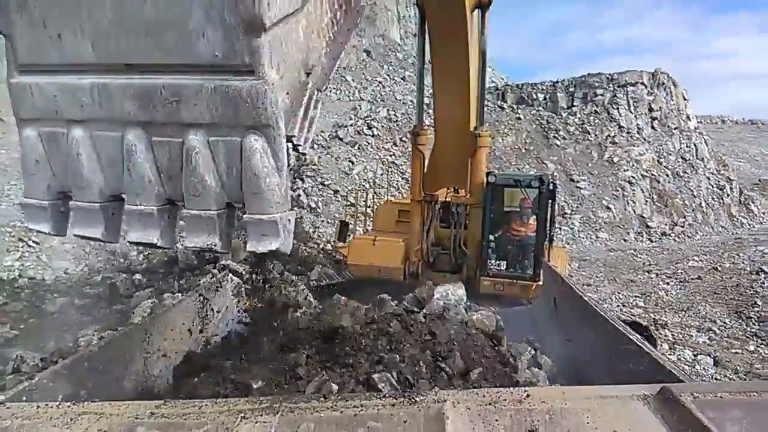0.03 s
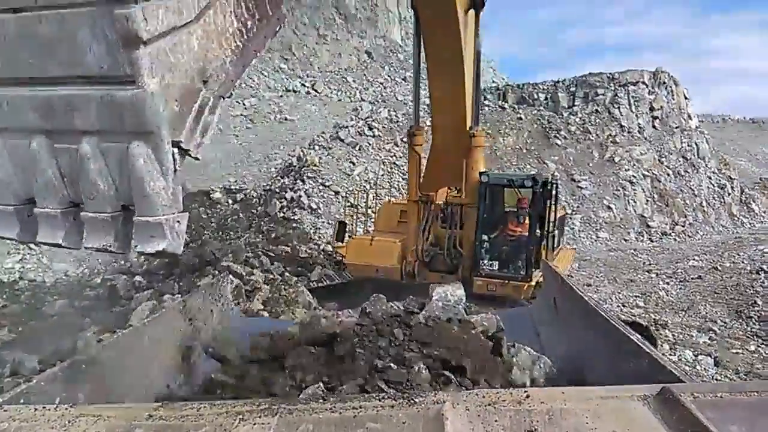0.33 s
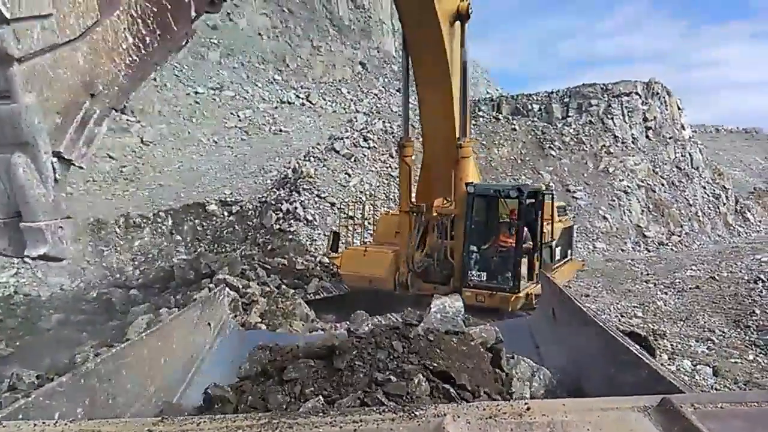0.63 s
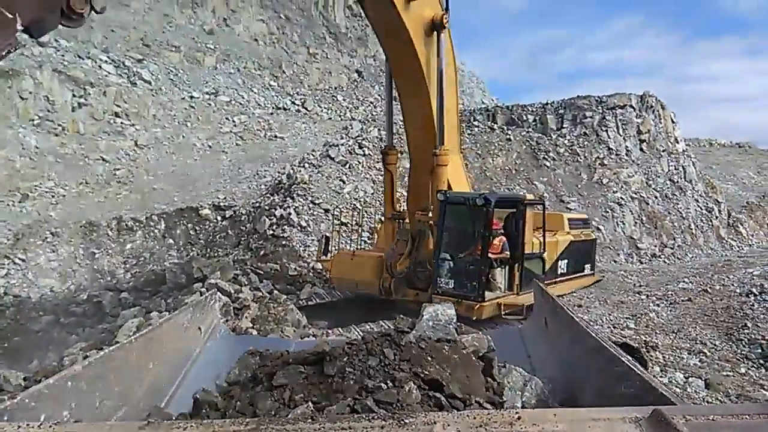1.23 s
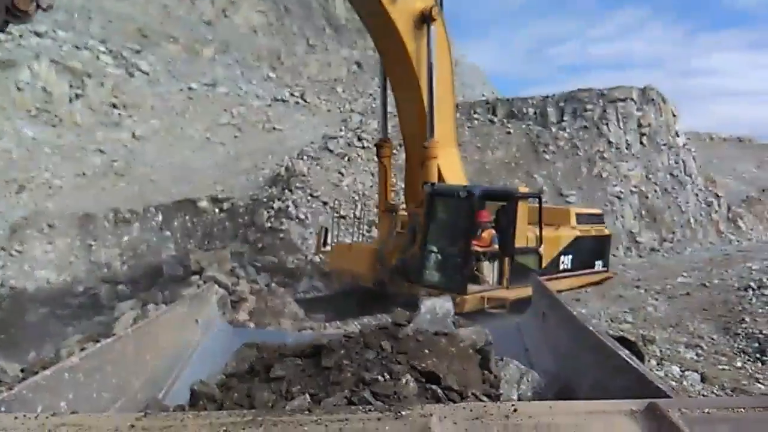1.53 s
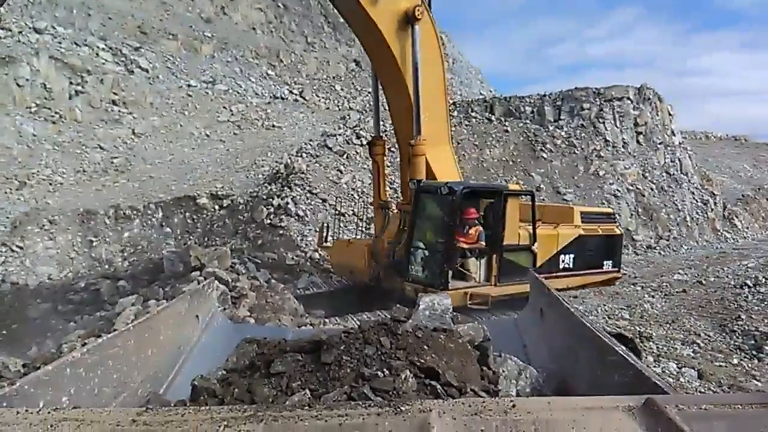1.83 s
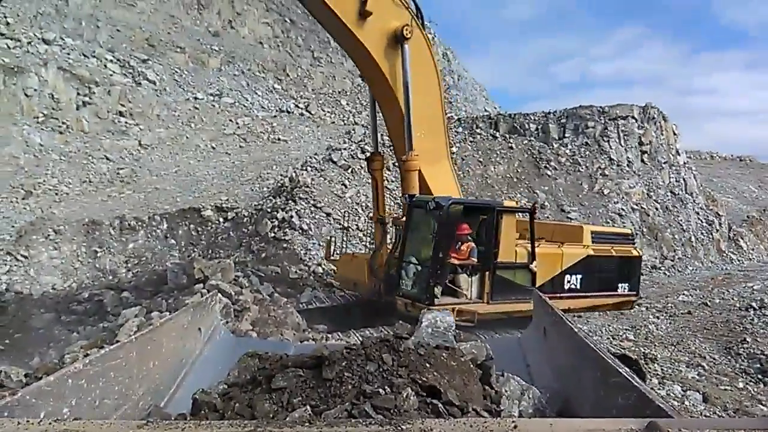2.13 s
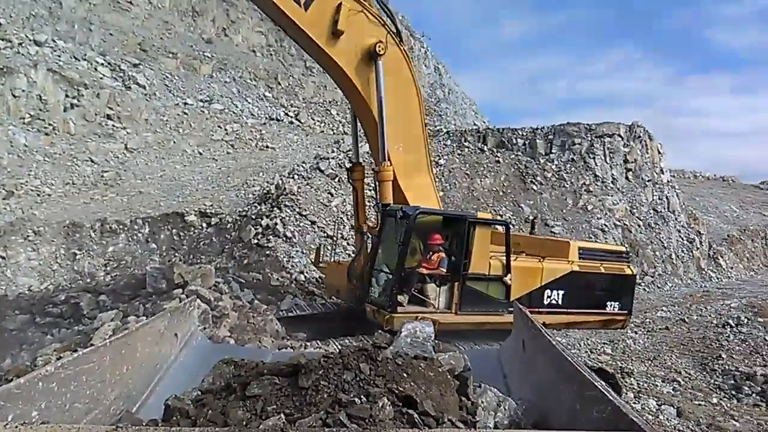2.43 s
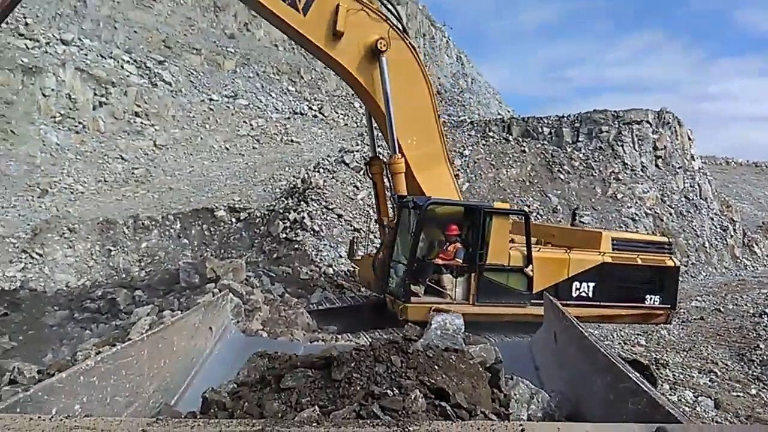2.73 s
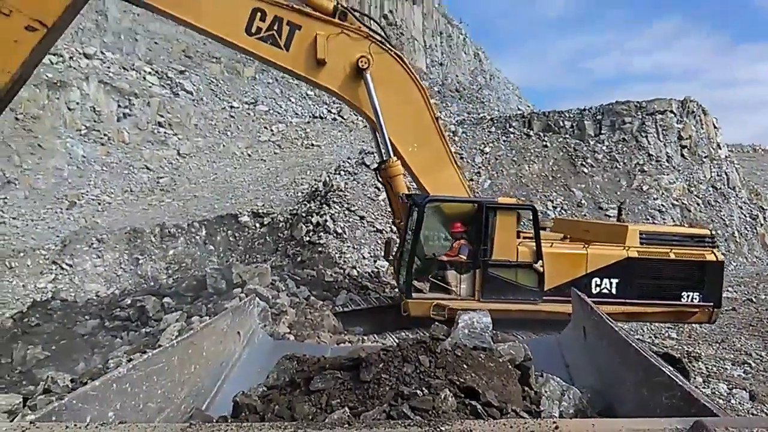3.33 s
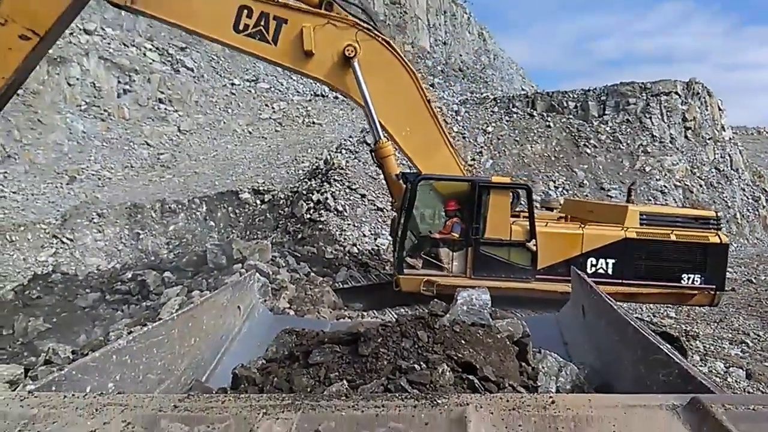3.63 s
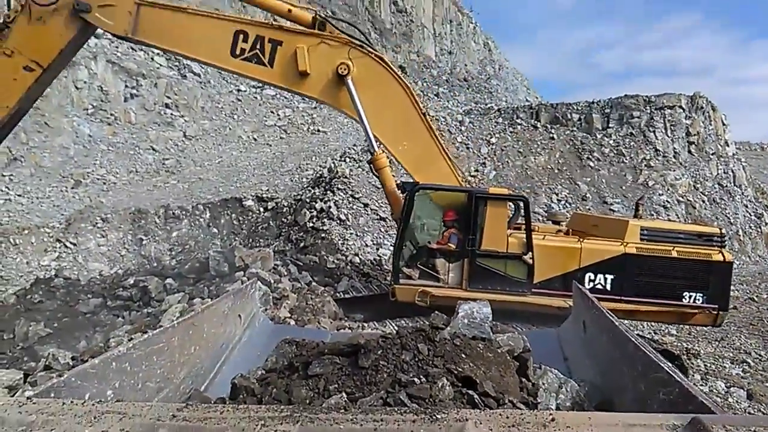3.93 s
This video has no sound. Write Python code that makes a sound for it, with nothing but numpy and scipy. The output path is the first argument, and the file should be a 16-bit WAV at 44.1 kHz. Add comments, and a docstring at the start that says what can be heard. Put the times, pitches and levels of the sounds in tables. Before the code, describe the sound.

An excavator dumps rocks into a truck bed, then swings away, droning and whining.

```python
"""A steel truck bed clatters and booms as the last earth and rocks slide in from an excavator bucket.
Each impact excites the damped modes of the bed's walls or floor. The truck idles throughout; the
excavator's diesel sags under load and beats against it. Its pumps whine at harmonics of their stroke
rate, and oil hisses, sings and whistles through the valves as the boom groans, knocks and swings away."""
import sys
import numpy as np
from scipy import signal
from scipy.fft import rfft, irfft
from scipy.io import wavfile
from scipy.ndimage import uniform_filter1d

SR = 44100
rng = np.random.default_rng(int(sys.argv[2]) if len(sys.argv) > 2 else 0)


def file_out(sig):
    """Save sig as 16-bit WAV at sys.argv[1]."""
    # one column per channel
    cols = np.atleast_2d(sig).T
    # limit, then scale
    lim = np.clip(cols, -1, 1)
    pcm = np.round(lim * 32767).astype(np.int16)
    wavfile.write(sys.argv[1], SR, pcm)


N = 176400

# envelopes of pouring stones, sliding grit and landing earth: (time [s], level [dB])
POUR_LEVEL = [(0, -9), (.06, -14.5), (.14, -18), (.2, -11.5), (.29, -13), (.38, -23.5), (.47, -25),
              (.56, -30), (.66, -34.5), (.76, -40), (.9, -49), (1.0, -46.5), (1.2, -64), (1.5, -120)]
GRIT_LEVEL = [(0, -21.5), (.06, -27), (.11, -23.5), (.25, -31), (.36, -37.5), (.45, -45.5), (.6, -45.5),
              (.75, -59), (.95, -64), (1.1, -83)]
EARTH_LEVEL = [(0, -39), (.15, -22), (.28, -19), (.37, -10), (.56, -12.5), (.63, -13.5), (.74, -26),
               (.95, -28), (1.2, -58), (1.4, -53)]
# spectra of the walls, soil, grit and bright snaps: (frequency [Hz], relative density [dB])
WALL_SPECTRUM = [(90, -10), (200, -3), (500, 2), (900, 1.5), (1500, -1.5), (2200, -4), (2850, -6.5),
                 (3400, -18.5), (4500, -31.5), (5800, -30.5), (7200, -40)]
SOIL_SPECTRUM = [(45, -27.5), (70, -19.5), (120, 0), (250, -0.5), (380, -2.5), (500, -16.5)]
GRIT_SPECTRUM = [(1000, -32.5), (2800, 1.5), (3600, -5), (4600, -12), (5700, -13), (6500, -31),
                 (7500, -28.5)]
SNAP_SPECTRUM = [(2500, 10), (8000, -13.5), (11000, 1.5), (14000, -5)]
# modes of the steel walls and the loaded floor: (frequency [Hz], relative level [dB], T60 [s])
WALL_MODES = [(361, -5, .14), (433, 1, .25), (563, -3, .3), (690, -2, .25), (754, -4, .3), (945, -3, .2),
              (1004, -3, .25), (1145, -6, .2), (1271, -4, .25), (1346, -5, .25), (1415, -3, .3),
              (1599, -4, .3), (1833, -6, .25), (2200, -5, .25)]
LOADED_FLOOR_MODES = [(144.5, -13, 0.53), (179.8, -5.5, 0.24), (219.7, -4.5, 0.085), (250, -3, 0.059),
                      (332, -5, 0.091), (433.7, -6.5, 0.046)]
# single rocks: (time [s], level [dB], low-pass corner [Hz], spot resonance [Hz], thud gain [dB])
ROCK_HITS = [(0.077, -9.5, 5100, 2300, -13), (0.097, -9, 5000, 2000, -18), (0.164, -11, 2500, 1400, -34),
             (0.222, -11.5, 1000, 690, -7), (.321, -12.5, 3500, 2600, -8), (0.354, -14, 4000, 2370, -8),
             (0.375, -19, 4000, 2630, -22), (.494, -17.5, 5500, 2800, -8), (0.501, -16.5, 1500, 926, -14),
             (0.587, -18, 2600, 2110, -11), (0.613, -26, 2000, 1410, -5.5), (0.693, -36.5, 2000, 1600, -16),
             (0.779, -26, 3520, 2690, -22.5), (0.786, -15, 2800, 1740, -19), (0.79, -13.5, 900, 425, -23),
             (0.799, -25.5, 2480, 2110, -24), (0.823, -16.5, 500, 450, -20), (0.883, -24, 800, 760, -6)]
# short, bright crackles of noise: (time [s], level [dB])
SNAP_BURSTS = [(0.083, -21), (0.088, -12), (0.098, -19), (.107, -21), (0.166, -27), (.182, -18),
               (0.198, -26), (.217, -29), (.326, -30)]
# clods landing: (time [s], level [dB], frequency [Hz])
CLOD_HITS = [(0.174, -14, 270), (.25, -5, 266.5), (0.281, -10, 298), (.36, -6, 181.7), (.385, -7, 181),
             (.44, -2.5, 178), (.535, -2.5, 186), (.56, -7, 171), (.582, -7.5, 134), (.92, -18, 221)]

# partials of the idling truck: (harmonic number, level [dB])
IDLE_PARTIALS = [(3, -50.5), (4, -36.5), (5, -28.5), (7, -38)]
# the excavator's firing rate: (time [s], rate [Hz])
FIRING_RATE = [(0.0, 102.25), (1.0, 101.24), (1.4, 100.27), (1.8, 99.07), (2.1, 97.12), (2.35, 95.86),
               (2.6, 93.3), (2.95, 94.55), (3.2, 92.73), (3.6, 92.66), (4.0, 92.52)]
# its firing tones: (time [s], fundamental [dB], second harmonic [dB], third harmonic [dB])
FIRING_LEVELS = [(0, -33.5, -34.5, -41.5), (1.299, -30.5, -41, -67), (1.6, -38, -57, -36.5),
                 (2.0, -30.5, -35, -34), (2.5, -33.5, -39.5, -30.5), (2.95, -31.5, -31.5, -26.5),
                 (3.201, -26, -33, -33), (3.55, -26.5, -46.5, -52), (4, -25.5, -50, -42)]
# envelopes of exhaust rumble and engine growl: (time [s], level [dB])
RUMBLE_LEVEL = [(0, -26), (1.33, -37.5), (1.43, -23), (1.58, -32), (1.72, -26.5), (1.92, -33.5),
                (2.12, -23.5), (2.32, -29.5), (2.8, -24), (3.15, -27), (3.36, -23.5), (3.55, -28),
                (4, -24.5)]
GROWL_LEVEL = [(1.0, -42.5), (1.32, -41), (1.46, -35.5), (1.71, -39), (2.18, -33.5), (2.43, -33),
               (2.44, -31.5), (3.26, -32), (3.27, -29.5), (3.95, -32)]
# spectra of engine noise and oil noise: (frequency [Hz], relative density [dB])
EXHAUST_SPECTRUM = [(25, -29), (45, -16.5), (80, -10), (125, -9), (220, -2.5), (300, -3), (370, -16),
                    (460, -21.5), (800, -27.5)]
GROWL_SPECTRUM = [(300, -5), (480, -9.5), (600, -5.5), (720, 3), (850, 3), (970, -5), (1100, -13),
                  (1300, -9.5), (1700, -14), (2500, -23.5)]
HISS_SPECTRUM = [(900, -9), (1300, -9), (1700, -4), (2200, -4.5), (2750, 3), (3000, -2), (3250, -16),
                 (3600, -14.5), (4300, -34), (6000, -28)]
SPRAY_SPECTRUM = [(2800, 4), (3500, 5.5), (4200, -0.5), (5000, -2), (5750, -6), (6300, -15.5), (7000, -22),
                  (7600, -33)]
# pump whine: (time [s], fundamental [dB], octave [dB])
PUMP_LEVELS = [(0, -21, -27.5), (.85, -33, -35.5), (1.05, -21, -42), (1.299, -32.5, -53), (1.9, -31, -70),
               (2.15, -34.5, -40), (2.4, -32, -43.5), (2.75, -41.5, -32), (3.151, -28.5, -30.5),
               (3.55, -44, -28), (4, -54, -29.5)]
# oil flow through the valves: (time [s], hiss [dB], spray [dB])
FLOW_LEVELS = [(1.0, -48, -52.5), (1.06, -40.5, -57), (1.98, -36.5, -48.5), (2.14, -34, -46),
               (3.11, -27, -37.5), (3.23, -29, -39.5), (3.24, -33, -37), (3.29, -28.5, -38),
               (3.88, -27, -44), (3.95, -34, -44)]

# knocks in the arm: (time [s], level [dB], frequency [Hz], T60 [s])
ARM_KNOCKS = [(1.38, -24.5, 346, 0.27), (2.12, -16.5, 274, 0.12), (3.336, -13.5, 87, 0.17)]
# groans of the swing gear: (time [s], level [dB])
GEAR_GROANS = [(1.494, -34), (1.868, -40), (1.982, -35), (2.061, -33.5), (2.145, -31), (2.344, -27),
               (2.446, -29.5), (2.56, -26.5), (2.669, -25), (2.792, -24), (2.933, -29), (3.06, -28),
               (3.375, -28), (3.533, -27.5), (3.681, -27), (3.81, -29), (3.875, -30.5)]
# two sliding valve resonances: (time [s], lower [Hz], lower level [dB], upper [Hz], upper level [dB])
SLIDING_RESONANCES = [(1.95, 2230, -72, 2788, -62), (2.08, 2210, -36, 2750, -42.5),
                      (2.22, 2140, -43, 2660, -38), (2.38, 1920, -37.5, 2560, -32.5),
                      (2.55, 2007, -34, 2532, -32), (2.75, 2123, -36, 2820, -41.5),
                      (3.0, 2182, -40.5, 2808, -36), (3.3, 2080, -35, 2740, -29),
                      (3.5, 2228, -42, 2827, -33), (3.72, 2260, -34, 2896, -31),
                      (3.86, 2190, -36.5, 2724, -40), (4, 2370, -39, 2630, -29.5)]
# steady valve resonances: (frequency [Hz], width [Hz], level [dB], onset [s])
STEADY_RESONANCES = [(3536, 420, -40.5, 3.25), (1603, 140, -42.5, 3.5), (1287, 260, -45, 2.09)]
# oil whistles: (onset [s], duration [s], level [dB], start pitch [Hz], end pitch [Hz])
OIL_WHISTLES = [(1.95, 0.75, -56.5, 5910, 5640), (2.195, 0.56, -58, 5000, 4900),
                (2.948, 0.73, -51, 5020, 4830), (3.252, 0.25, -51.5, 5550, 5710)]

STROKES_PER_FIRING = 1.7843
TIME = np.arange(N) / SR
RING_TIME = TIME[:SR // 2]  # half a second for impulse responses


def from_db(db):
    """Amplitude ratio: a factor of ten per 20 dB."""
    return 10 ** (np.asarray(db) / 20)


def unit_rms(x):
    """Normalisation to unit mean power."""
    return x / np.sqrt(np.mean(x ** 2) + 1e-20)


def curves(rows):
    """Linear interpolation of each column over time."""
    times, *columns = np.transpose(rows)
    return [np.interp(TIME, times, column) for column in columns]


def drift(rate_hz):
    """Slow random modulation: low-passed noise of unit rms."""
    step, settle = 40, 2000
    pole = np.exp(-2 * np.pi * rate_hz * step / SR)
    noise = rng.standard_normal(N // step + settle + 2)
    slow = signal.lfilter([1], [1, -2 * pole, pole * pole], noise)[settle:]
    return np.interp(np.arange(N) / step, np.arange(len(slow)), unit_rms(slow))


def colour(x, spectrum):
    """Minimum-phase filtering, falling 24 dB per octave past the spectrum's ends; unit rms."""
    hz, db = np.transpose(spectrum)
    n = len(x)
    octave = np.log2(np.maximum(np.arange(n + 1) * SR / (2 * n), 1))
    points = np.log2(hz)
    outside = np.abs(octave - np.clip(octave, points[0], points[-1]))
    cepstrum = irfft(np.log(from_db(np.interp(octave, points, db) - 24 * outside)))
    cepstrum[1:n] *= 2  # folding the cepstrum makes the filter causal
    cepstrum[n + 1:] = 0
    return unit_rms(irfft(rfft(x, 2 * n) * np.exp(rfft(cepstrum)))[:n])


def noise_band(hz, width_hz):
    """Narrow-band noise from two equal resonators in cascade; unit rms."""
    radius = np.exp(-np.pi * width_hz / SR)
    section = [1, 0, -1, 1, -2 * radius * np.cos(2 * np.pi * hz / SR), radius * radius]
    return unit_rms(signal.sosfilt([section, section], rng.standard_normal(N)))


def burst(at_s, rise_s, t60):
    """Envelope of a transient: Gaussian rise, exponential decay."""
    t = TIME - at_s
    return np.exp(-(np.minimum(t, 0) / rise_s) ** 2) * from_db(-60 * np.maximum(t, 0) / t60)


def grains(per_s, spread_db):
    """Shot noise: independent impacts of uneven size; unit rms."""
    sizes = from_db(spread_db * np.minimum(rng.exponential(1, N), 4)) * rng.choice([-1, 1], N)
    return unit_rms(sizes * (rng.random(N) < per_s / SR))


def levelled(x):
    """Division by the running rms holds the level steady."""
    return x / np.sqrt(np.abs(uniform_filter1d(x ** 2, size=3000)) + 1e-9)


def modal_response(modes):
    """Modal superposition: a tap at a random spot gives damped sines of random sign; unit energy."""
    response = sum(rng.choice([-1, 1]) * from_db(db - 60 * RING_TIME / t60)
                   * np.sin(2 * np.pi * hz * RING_TIME) for hz, db, t60 in modes)
    return unit_rms(response) / np.sqrt(len(RING_TIME))


def excite(force, response):
    """A linear body convolves the force with its impulse response."""
    return signal.fftconvolve(force, response)[:N]


def wall_response(crack_t60=.014, wash_t60=.31):
    """Impulse response of a spot on the walls: a crack, overlapping modes, clear modes; unit energy."""
    n = len(RING_TIME)
    crack, wash = (colour(rng.standard_normal(n) * from_db(-60 * RING_TIME / t60), WALL_SPECTRUM)
                   for t60 in (crack_t60, wash_t60))
    ring = from_db(-3.5) * unit_rms(modal_response(WALL_MODES))
    return unit_rms(crack + wash + ring) / np.sqrt(n)


def floor_boom(impacts, low_cut_hz=109):
    """Impacts drive the modes of the loaded floor; a high-pass filter thins out the deepest bass."""
    bass_cut = signal.butter(2, low_cut_hz, "high", fs=SR, output="sos")
    return signal.sosfilt(bass_cut, excite(impacts, modal_response(LOADED_FLOOR_MODES)))


def falling_load():
    """Dense impacts merge into noise: stones ring the walls, soil tumbles, grit slides, earth booms."""
    (pour_db,), (grit_db,), (earth_db,) = map(curves, (POUR_LEVEL, GRIT_LEVEL, EARTH_LEVEL))
    stones = sum(excite(grains(per_s=100, spread_db=3), wall_response()) for _ in range(4))
    soil = colour(grains(per_s=470, spread_db=1.5), SOIL_SPECTRUM)
    grit = colour(grains(per_s=7100, spread_db=1), GRIT_SPECTRUM)
    earth = floor_boom(grains(per_s=180, spread_db=1))
    return (from_db(pour_db + 3.5) * levelled(stones)
            + from_db(.48 * pour_db - 11) * levelled(soil)  # fades more slowly than the stones
            + from_db(grit_db + 5.5) * grit
            + from_db(earth_db) * levelled(earth))


def tone(cycles, rms_db, waver_db=1.5):
    """A sinusoid under slight random amplitude modulation."""
    return np.sqrt(2) * from_db(rms_db + waver_db * drift(2.2)) * np.cos(2 * np.pi * cycles)


def truck_idle(base_hz=21.086):
    """An engine at constant speed is periodic, so its partials are multiples of one rate."""
    return sum(tone(order * base_hz * TIME, db) for order, db in IDLE_PARTIALS)


def harmonics(cycles, levels, flutter_db=2.5):
    """A harmonic series whose overtones flutter more than its fundamental."""
    fundamental_db, *overtone_dbs = curves(levels)
    return tone(cycles, fundamental_db) + sum(tone(order * cycles, db + flutter_db * drift(6.5))
                                              for order, db in enumerate(overtone_dbs, start=2))


def excavator_diesel(firings):
    """Periodic combustion gives harmonics and modulates the noise of exhaust rumble and growl."""
    (rumble_db,), (growl_db,) = curves(RUMBLE_LEVEL), curves(GROWL_LEVEL)
    tones = harmonics(firings, FIRING_LEVELS)
    puffs = 1 + .068 * np.cos(2 * np.pi * firings)
    crank_turns = firings / 3
    throb = (1 + .4 * np.cos(2 * np.pi * crank_turns)) * from_db(1.5 * drift(8))
    exhaust = levelled(colour(rng.standard_normal(N) * puffs, EXHAUST_SPECTRUM))
    growl_gain = from_db(growl_db + .5 + 1.3 * drift(26))
    growl = colour(rng.standard_normal(N) * puffs, GROWL_SPECTRUM)
    return tones + from_db(rumble_db - 1) * throb * exhaust + growl_gain * growl


def hydraulics(strokes):
    """Periodic pump strokes give a harmonic whine and modulate the flow noise of the valves."""
    whine = harmonics(strokes, PUMP_LEVELS)
    hiss_db, spray_db = curves(FLOW_LEVELS)
    ripple = (1 + .12 * np.cos(2 * np.pi * strokes)) * from_db(1.5 * drift(27))
    hiss = from_db(hiss_db - 5.5) * colour(rng.standard_normal(N) * ripple, HISS_SPECTRUM)
    spray = from_db(spray_db - 1) * colour(rng.standard_normal(N) * ripple, SPRAY_SPECTRUM)
    return whine + hiss + spray


def rocks(attack_s=.0022, crumble_s=.008):
    """Crumbling rocks excite wall and floor; the harder the contact, the more treble in the clank."""
    clanks, thuds = np.zeros(N), np.zeros(N)
    chips = grains(per_s=2000, spread_db=2)
    for at_s, db, corner_hz, spot_hz, thud_db in ROCK_HITS:
        crumbling = np.exp(-np.abs(TIME - at_s) / np.where(TIME < at_s, attack_s, crumble_s))
        contact = unit_rms(chips * crumbling) * from_db(db - 22)
        pole = np.exp(-2 * np.pi * corner_hz / SR)
        wall = signal.lfilter([1 - pole], [1, -pole], wall_response())
        # each struck spot favours one pitch
        spot = signal.lfilter(*signal.iirpeak(spot_hz, Q=3.5, fs=SR), wall)
        clanks += excite(contact, wall + from_db(5) * spot)
        thuds += contact * from_db(thud_db)
    return clanks + floor_boom(thuds)


def bright_snaps():
    """Broadband transients: short, bright crackles, like overload, in the loudest part of the pour."""
    envelope = sum(from_db(db) * burst(at_s, rise_s=.001, t60=.04) for at_s, db in SNAP_BURSTS)
    return envelope * colour(rng.standard_normal(N), SNAP_SPECTRUM)


def thump(at_s, db, hz, rise_s, t60):
    """Free decay of one damped resonance after a soft blow."""
    return from_db(db) * burst(at_s, rise_s, t60) * np.sin(2 * np.pi * hz * (TIME - at_s))


def clods():
    """Soft impacts excite low frequencies: lumps of earth thump on the loaded floor."""
    return sum(thump(at_s, db, hz, rise_s=.008, t60=.22) for at_s, db, hz in CLOD_HITS)


def pebble():
    """A light impact excites high frequencies: one late chip ticks on the steel."""
    return from_db(-56) * burst(at_s=1, rise_s=.004, t60=.083) * noise_band(6000, width_hz=1500)


def boom_swing(groan_half_width_s=.018):
    """Resonances briefly excited: the arm knocks, the swing gear groans, and there is one squeak."""
    knocks = sum(thump(at_s, db, hz, rise_s=.005, t60=t60) for at_s, db, hz, t60 in ARM_KNOCKS)
    squeak_gain = from_db(-23) * burst(at_s=3.243, rise_s=.01, t60=.12)
    squeak = squeak_gain * levelled(noise_band(3580, width_hz=100))
    swells = sum(from_db(db) * np.exp(-((TIME - at_s) / groan_half_width_s) ** 2)
                 for at_s, db in GEAR_GROANS)
    groans = swells * levelled(noise_band(820, width_hz=130))
    return knocks + groans + squeak


def sliding_band(hz, width_hz):
    """Quadrature modulation centres low-passed noise on a moving frequency; unit rms."""
    low_pass = signal.butter(2, width_hz / 2, fs=SR, output="sos")
    in_phase, quadrature = signal.sosfilt(low_pass, rng.standard_normal((2, N)))
    phase = 2 * np.pi * np.cumsum(hz) / SR
    return unit_rms(in_phase * np.cos(phase) + quadrature * np.sin(phase))


def valve_song(strokes, opening_s=.041):
    """Oil flow excites valve resonances, two sliding with the spools; pump strokes add a rasp."""
    lower_hz, lower_db, upper_hz, upper_db = curves(SLIDING_RESONANCES)
    song = from_db(lower_db) * sliding_band(lower_hz, width_hz=115)
    song += from_db(upper_db) * sliding_band(upper_hz, width_hz=150)
    for hz, width_hz, db, onset_s in STEADY_RESONANCES:
        opening = np.clip((TIME - onset_s) / opening_s, 0, 1)
        song += from_db(db) * opening * noise_band(hz, width_hz)
    rasp = 1 + .25 * np.cos(2 * np.pi * strokes)
    return song * rasp * from_db(1.3 * drift(25))


def oil_whistles():
    """Narrow-band flow noise swells and glides as oil squeezes past the spools."""
    whistles = np.zeros(N)
    for onset_s, length_s, db, start_hz, end_hz in OIL_WHISTLES:
        progress = np.clip((TIME - onset_s) / length_s, 0, 1)
        swell = np.sqrt(np.abs(np.sin(np.pi * progress)))
        hz = start_hz + (end_hz - start_hz) * progress
        whistles += from_db(db) * swell * sliding_band(hz, width_hz=200)
    return whistles


def scene():
    """Superposition of load, engines and hydraulics in one channel; the pumps follow the diesel."""
    firings = np.cumsum(curves(FIRING_RATE)[0]) / SR  # phase in cycles
    strokes = STROKES_PER_FIRING * firings
    load = falling_load() + rocks() + clods() + bright_snaps() + pebble()
    engines = truck_idle() + excavator_diesel(firings)
    oil = hydraulics(strokes) + valve_song(strokes) + oil_whistles()
    return (load + engines + oil + boom_swing())[None]


def record(dry, ceiling=.84, shelf_hz=6900, shelf_db=-27, cutoff_hz=15267):
    """Soft saturation rounds the peaks; filters lower the treble to a shelf and cut the top."""
    rounded = dry / (1 + (dry / ceiling) ** 4) ** (1 / 4)
    dull = signal.sosfilt(signal.butter(12, shelf_hz, fs=SR, output="sos"), rounded)
    shelved = dull + from_db(shelf_db) * rounded
    return signal.sosfilt(signal.butter(12, cutoff_hz, fs=SR, output="sos"), shelved)


dry = scene()
out = record(dry)
file_out(out)
```